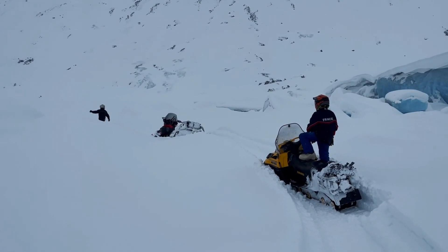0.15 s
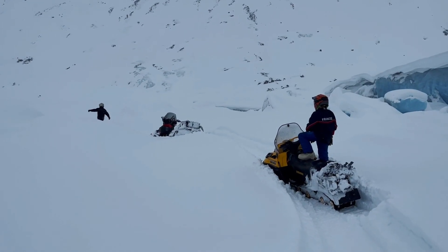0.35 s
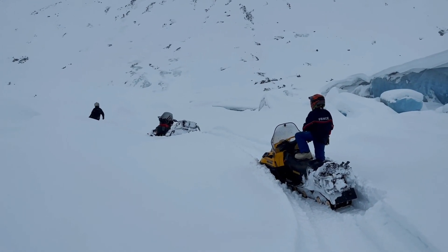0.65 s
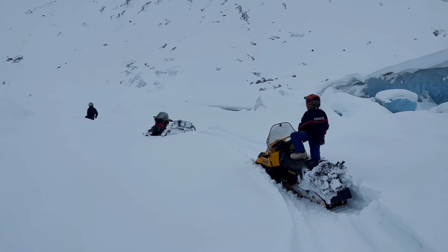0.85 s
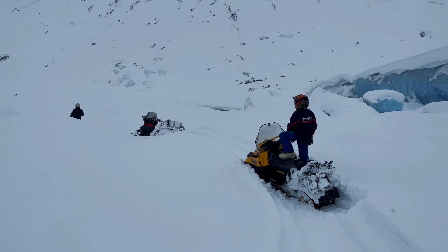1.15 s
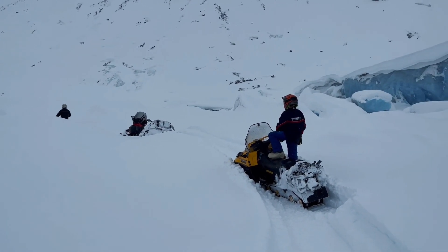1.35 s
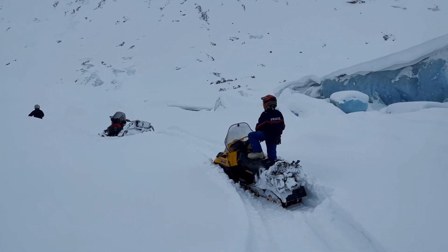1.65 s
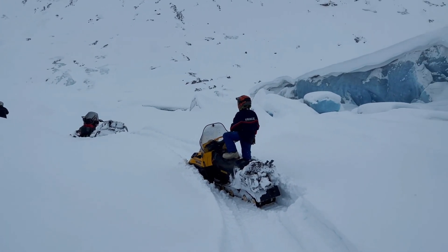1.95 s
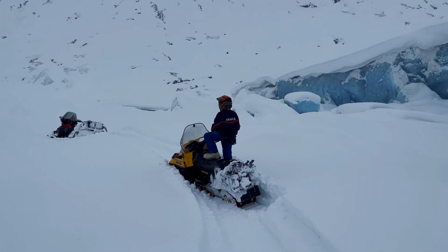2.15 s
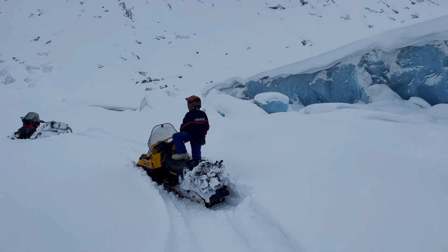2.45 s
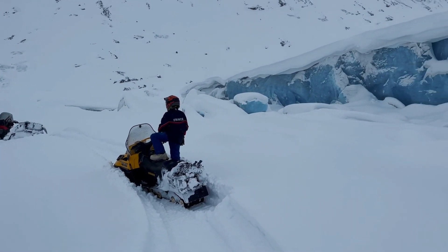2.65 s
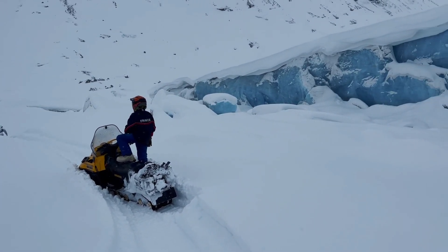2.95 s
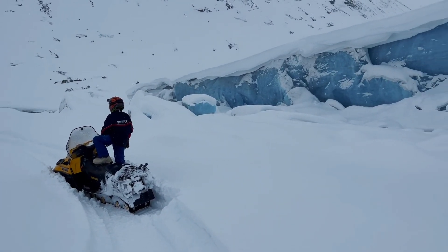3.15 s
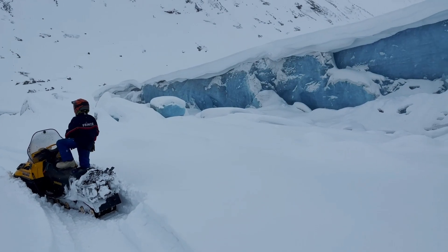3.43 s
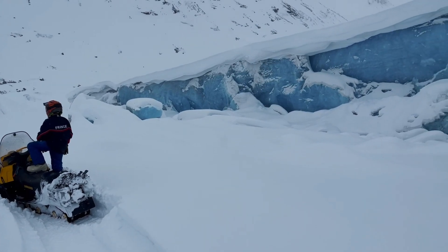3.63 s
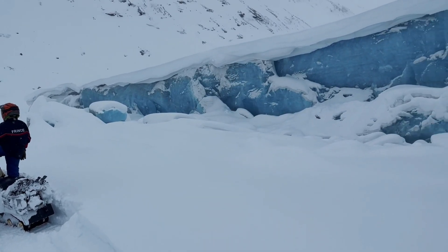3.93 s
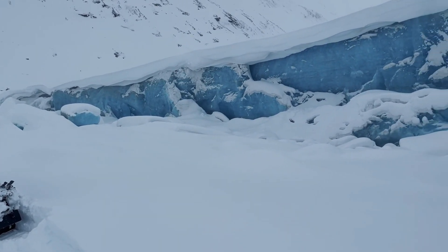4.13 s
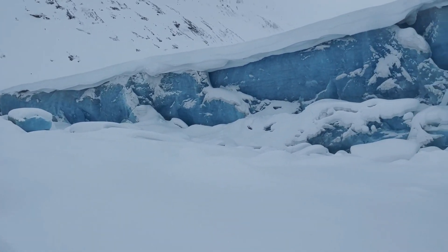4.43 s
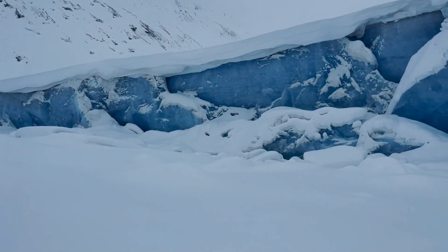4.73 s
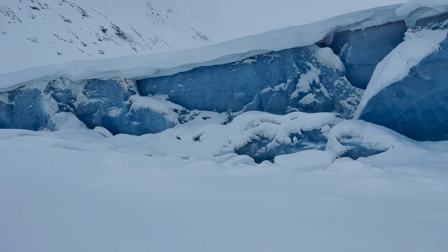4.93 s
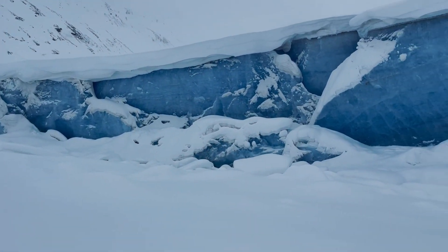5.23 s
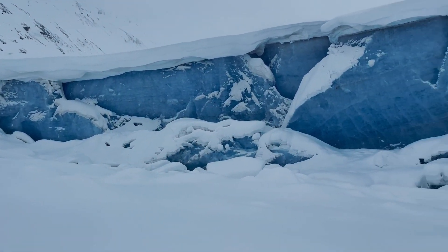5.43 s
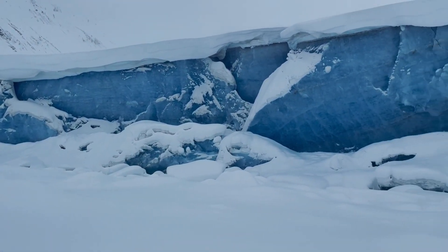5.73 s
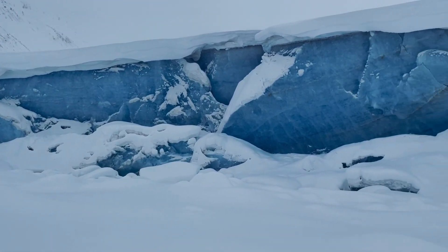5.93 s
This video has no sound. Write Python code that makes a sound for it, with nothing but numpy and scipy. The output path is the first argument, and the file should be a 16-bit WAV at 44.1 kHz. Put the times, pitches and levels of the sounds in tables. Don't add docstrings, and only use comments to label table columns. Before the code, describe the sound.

A small two-stroke snowmobile engine idles from start to finish, close and dry on open snow. Its low, round exhaust pops come about twenty-six per second, in a limping pattern of strong, late, weak and nearly missing beats, with metallic knocks, grainy rattle and a hissy casing whir. From 0 to 0.4 s a few short wind puffs flutter on the microphone, with small low bumps near 0.9, 1.1 and 2.3 s. Between about 2 and 4.8 s the exhaust is fuller and steadier, while the camera's turn shifts the engine leftward and sweeps a hollow, phasey colour through the treble. A soft gust rolls past at 3.7-4.2 s, another at 4.5 s. Around 5 s heavy thumps and rapid buffets hit, continuing irregularly. From 5.75 to 5.95 s the wind is loudest, a bright, tearing, crackling blast, easing into low flutter by 6.08 s.

```python
import sys
import numpy as np
from scipy import signal
from scipy.fft import rfft, irfft, next_fast_len
from scipy.io import wavfile
from scipy.ndimage import uniform_filter1d

SR = 44100
rng = np.random.default_rng(int(sys.argv[2]) if len(sys.argv) > 2 else 0)


def boost_factor(decibels):
    exponent = np.asarray(decibels, float) / 20
    return 10 ** exponent


def persist_wave(psi):
    counts = np.round(np.clip(psi, -1, 1) * 32767).astype(np.int16)
    wavfile.write(sys.argv[1], SR, np.atleast_2d(counts).T)


N = 268348

# puff t/s, knock level/dB, full-firing puff level/dB
CRANK = [(.0664, -42.5, -23), (.421, -39, -25.5), (.7652, -39.5, -19), (1.109, -37.5, -23),
         (1.432, -40, -16.5), (1.7677, -38, -16.5), (2.123, -40.5, -16), (2.4695, -37, -14),
         (2.7954, -42.5, -13.5), (3.113, -39.5, -14), (3.4509, -39, -13.5), (3.7966, -37, -14),
         (4.151, -38, -14), (4.4999, -37.5, -12.5), (4.8472, -40.5, -14), (5.1802, -44, -19),
         (5.525, -38.5, -24), (5.885, -50, -16.5)]
# delay/ms, knock level/dB, puff level/dB
LOPE = [
    (-0.012, 0.5, -1.5),
    (-1.545, -18.5, -13.5),
    (0.67, 1.35, -1),
    (0.031, -14, -5.5),
    (-1.095, -2.5, -7),
    (1.83, -2.5, 0),
]
# t/s, knock level/dB, puff level/dB
ODD_TURNS = [(.267, 6.5, -13), (.341, 3, -3), (.537, -3, -4), (.689, -2, -6.5), (.728, -8.5, -6.5),
             (.999, -4.5, -3), (.921, -4, -14), (1.073, 0.5, -2.5), (1.142, -7.5, -11.5), (1.287, -2, -5),
             (1.396, -8, -5.5), (1.468, -1, -13), (1.768, 2.5, 1), (2.28, 0, -16.5), (2.356, -2.5, -4.5),
             (2.507, -1.5, -5), (2.689, 9.5, 4), (2.939, 0, 6.5), (3.007, -5, -5), (3.113, 0, 3.5),
             (3.488, -11, 2.5), (3.3, -0.5, -0.5), (3.797, -27, 4), (3.993, 0.5, -8), (4.034, 5.5, -0.5),
             (4.459, -4, -13), (4.539, 6.5, 6.5), (4.614, -1, -22), (5.032, -15.5, 0.5), (5.445, 0, -16),
             (.616, 1.5, 0.5), (1.109, 2, -1), (1.22, 0.5, 5.5), (1.584, 3.5, 0), (1.695, 3, 1.5),
             (1.731, -1, -3.5), (1.809, 1.5, 6.5), (1.93, 1.5, 7), (2.008, 7.5, 2), (2.123, 1.5, 3),
             (2.395, -0.5, 5), (2.47, 2, -3), (2.832, -1.5, 7), (3.043, -4, 1.5), (3.188, -3.5, 0),
             (3.263, -1, 10), (3.72, 1, 1.5), (3.836, -3.5, -5), (4.228, -2, 2), (4.423, 2.5, 0),
             (4.5, 3, 2), (4.577, 6, -0.5), (4.731, -3, -4.5), (4.77, 0, -4.5), (4.995, 4, -4),
             (5.143, 4.5, 1.5), (5.295, 2, -5), (5.685, 4.5, -9.5), (5.96, 5.5, -1.5), (6.037, -3.5, -6)]
# f/Hz, width/Hz, knock level/dB, whir level/dB
CASING_MODES = [(400.15, 13.9, -12, -12), (620, 48.6, -24, -8), (787.5, 40.4, -4, -2),
                (1148.4, 249, 0, 2.5), (1645, 254, 3, 0.5), (1924.6, 60.5, 7, 0.5), (2173, 253, 6, -5.5),
                (2598, 196, -5, -6), (3202.2, 87, -3, -27.5), (4325.5, 206, -1, -12.5),
                (6116, 370, -10, -40.5), (6274, 155, -10, -23), (8040, 340, -30.5, -32.5),
                (8538, 567, -5, -28), (10787, 440, -8, -35)]
# f/Hz, density/dB per Hz
HISS_SPECTRUM = [(200, -29), (500, -27.5), (1000, 0), (2100, -9), (2800, -8.5), (4000, -15), (6500, -12),
                 (7300, -22), (9000, -16.5), (11400, -24), (12200, -45.5)]
# t/s, right port lag/ms, whir level/dB
CAMERA_TURN = [(0, -0.0717, 6), (1, -0.0838, 4.5), (1.8, -0.0186, 4), (2.4, 0.129, 3.5), (2.8, 0.2027, 5.5),
               (3.2, 0.2556, 5.5), (3.7, 0.32, 5), (4.2, 0.3593, 4.5), (4.8, 0.4204, 2), (5.4, 0.4506, 2),
               (6.08, 0.44, 0.5)]
# f/Hz, delayed path share/1, lag share/1, unrelated share/1, fixed phase/rad, level/dB
RIGHT_PORT = [(100, 1, 1, .1, 0, -1), (700, 1, .78, .12, 0, -1), (1200, 1, .9, .12, 0, -1),
              (2300, 1, 1.2, .12, 0, -1), (2900, .9, .86, .2, 0, -2), (4200, .9, .74, .2, 0, -2),
              (5200, .7, .66, .3, 0, -3), (6300, .6, .6, .3, 0, -3), (7300, .2, .6, .8, 0, -5),
              (8300, 0, .6, .1, 0, 0), (8700, 0, .6, .1, 0.1, 0), (10250, 0, .6, .1, 3.14, 0),
              (11800, 0, .6, .1, 6.28, 0)]
# lag/ms, f/Hz; above it the whole lag is heard
SINKING_NOTCH = [(.31, 7200), (.375, 5100), (.41, 4250), (.43, 3870)]
# t/s, rumble level/dB
BREEZE = [(0.0, -28.5), (0.238, -34.5), (0.73, -40.5), (1.186, -35), (1.352, -38), (1.432, -32.5),
          (1.6, -47), (2.2, -45), (2.34, -38), (2.45, -46), (3.3, -44), (3.7, -34), (4.02, -30.5),
          (4.26, -34), (4.9, -35.5), (5.03, -23.5), (5.53, -37), (5.9, -28)]
# f/Hz, density/dB per Hz
BREEZE_SPECTRUM = [(20, -47.5), (30, -32), (45, -3), (65, 2), (90, 2.5), (130, -7), (220, -12), (350, -30),
                   (700, -66)]
# t/s, peak level/dB, brightness/octaves over 200 Hz, length/s
GUSTS = [(0.13, -25.5, 1.35, 0.0316), (0.156, -17.5, 2.59, 0.0158), (0.196, -20.5, 1.48, 0.0254),
         (0.262, -28, 0.506, 0.032), (0.408, -30.5, 0.81, 0.0222), (0.858, -27, 0.56, 0.042),
         (1.077, -27, 0.44, 0.0166), (1.405, -35, 1.26, 0.0146), (2.24, -31.5, 0.55, 0.0233),
         (2.328, -27, 1.61, 0.0168), (3.735, -26, 0.668, 0.1268), (3.962, -29, 0.28, 0.039),
         (4.157, -33, 0.856, .13), (4.537, -22, 1.096, 0.0323), (4.987, -13.5, 1.45, 0.0213),
         (5.016, -17.5, 1.33, 0.0087), (5.032, -14, 1.31, 0.0126), (5.059, -17, 0.55, 0.0166),
         (5.08, -17, 1.34, .008), (5.097, -16.5, 1.32, 0.00715), (5.114, -20.5, 1.05, 0.0097),
         (5.123, -16.5, 1.44, 0.0125), (5.138, -15, 0.716, 0.01694), (5.171, -24, 1.04, 0.0118),
         (5.239, -18, 1.556, 0.0166), (5.269, -21, 0.725, 0.0356), (5.335, -16, 1.43, 0.026),
         (5.363, -20, 1.59, 0.0091), (5.378, -21, 1.46, 0.0097), (5.52, -19, 1.61, 0.0403),
         (5.613, -16.5, 1.515, 0.0437), (5.677, -16, 2.263, 0.0212), (5.731, -16.5, 1.63, 0.0495),
         (5.776, -8.5, 2.74, 0.011), (5.783, -11.5, 3.37, 0.00764), (5.795, -12.5, 1.63, 0.0275),
         (5.821, -14, 1.3, .085), (5.819, -10.5, 3.61, 0.00614), (5.827, -8, 3.39, 0.0039),
         (5.835, -7, 3, 0.0081), (5.846, -9, 3.465, 0.0051), (5.856, -7.5, 3.24, 0.0049),
         (5.861, -10, 3.79, 0.009), (5.876, -10.5, 3.56, 0.00825), (5.886, -10, 3.45, 0.0104),
         (5.903, -10, 2.13, 0.0255), (5.925, -15, 2.86, 0.0128), (5.94, -20.5, 1.66, 0.0177),
         (6.003, -17, 1.86, 0.0218), (6.044, -21, 1.52, 0.0288)]
# t/s, level/dB, width/ms
SLAPS = [(.163, -14, 1.1), (4.9915, -3, 2), (5.0545, -3, 2), (5.62, -12, 2.5), (5.6845, -17, 1),
         (5.911, -11, 1.2), (5.082, -15, 1.4), (5.14, -6, 4), (5.247, -9, 1.8), (5.781, -5, 1.3),
         (5.932, -14, .35)]
# t/s, right port lead/rad
SLANT = [
    (0, 0.89),
    (1.2, 0.97),
    (1.4, -0.04),
    (4.9, -0.24),
    (4.97, 0.77),
    (5.74, 0.78),
    (5.77, -0.49),
    (6.08, -0.32),
]
# t/s, level/dB
TICKS = [
    (.931, -46),
    (1.0495, -42),
    (1.086, -38),
    (2.06, -45),
    (3.732, -46),
    (4.105, -45),
    (4.8905, -40),
]


def evened(x):
    return x / np.sqrt(np.mean(x ** 2) + 1e-20)


def read(points, hz):
    f, *values = np.transpose(points)
    return [np.interp(np.log(hz + 1), np.log(f + 1), v) for v in values]


def add(mix, start_s, sound):
    part = mix[..., round(start_s * SR):][..., :sound.shape[-1]]
    part += sound[..., :part.shape[-1]]


def coloured(x, spectrum):
    size = x.shape[-1]
    gain = boost_factor(read(spectrum, np.fft.rfftfreq(size, 1 / SR))[0])
    return irfft(rfft(x) * gain, size)


def ring(x, hz, width_hz):
    r = np.exp(-np.pi * width_hz / SR)
    poles = [1, -2 * r * np.cos(2 * np.pi * hz / SR), r * r]
    return np.sqrt(1 - r * r) * signal.lfilter([1, 0, -1], poles, x) / 2


def band(x, lo_hz, hi_hz, order=2):
    return signal.sosfilt(signal.butter(order, [lo_hz, hi_hz], "bandpass", fs=SR, output="sos"), x)


def firings():
    turns_per_row, last_turn_s = 9, .038
    slip_turn, slip = 134, 2
    scatter_db = 1.3
    end = np.add(CRANK[-1], [turns_per_row * last_turn_s, 0, 0])
    rows = np.vstack([CRANK, end])
    turn = np.arange(len(CRANK) * turns_per_row - 3)
    s, knock_db, puff_db = (np.interp(turn / turns_per_row, np.arange(len(rows)), c) for c in rows.T)
    phase = (turn - slip * (turn >= slip_turn)) % len(LOPE)
    late_ms, *lope_db = np.transpose(LOPE)[:, phase]
    odd_db = np.zeros((2, len(turn)))
    for at_s, *db in ODD_TURNS:
        odd_db[:, np.argmin(abs(s - at_s))] = db
    chance_db = scatter_db * rng.standard_normal((len(turn), 2)).T
    knock_db, puff_db = np.array([knock_db, puff_db]) + lope_db + odd_db + chance_db
    return s + late_ms / 1000, knock_db, puff_db


def casing(puff_s, knock_db):
    port_opens = .74
    t, knock, throb = np.arange(0, .09, 1 / SR), np.zeros(N), np.zeros(N)
    burst = (1 - np.exp(-t / .0045)) * np.exp(-t / .009)
    chug = (t / 0.00815) * np.exp(1 - t / 0.0057)
    swell = np.exp(-t / 0.0312)
    knock_s = np.maximum(puff_s - port_opens * np.gradient(puff_s) - .001, 0)
    under_way = (0.00228, -39)
    for s, db in [under_way, *zip(knock_s, knock_db)]:
        add(knock, s, boost_factor(db + 47.0) * burst)
        add(knock, s + 0.02422, boost_factor(0.29 * (db + 46) - 3.0) * burst)
        add(throb, s, 0.805 * boost_factor(0.605 * (db + 37.5)) * chug)
        add(throb, s, boost_factor(0.72 * (db + 42.0)) * swell)

    grit = boost_factor(1.21 * np.minimum(rng.exponential(1, N // 64 + 1), 4)).repeat(64)[:N]
    knock = knock * evened(grit * rng.standard_normal(N))

    time_s = np.arange(N) / SR
    turning_s, _, whir_db = np.transpose(CAMERA_TURN)
    whir = boost_factor(np.interp(time_s, turning_s, whir_db)) * (0.441 + 0.424 * throb) * rng.standard_normal(N)
    buzz = evened(band(rng.standard_normal(N), 1.54, 24.5, order=1))
    whir = whir * boost_factor(1.03 * buzz)

    turn = np.clip(np.searchsorted(knock_s, time_s) - 1, 0, None)
    uneven = boost_factor(1.7 * rng.standard_normal((len(puff_s), len(CASING_MODES))))
    rings = np.zeros(N)
    for k, (hz, width_hz, mode_knock_db, mode_whir_db) in enumerate(CASING_MODES):
        drive = uneven[turn, k] * boost_factor(mode_knock_db) * knock + boost_factor(mode_whir_db) * whir
        rings += (-1) ** k * ring(drive, hz, width_hz)
    hiss = coloured(knock + boost_factor(-9.5) * whir, HISS_SPECTRUM)
    return boost_factor(-42.5) * rings + boost_factor(-25) * hiss


def exhaust(puff_s, puff_db):
    t, out = np.arange(0, .06, 1 / SR), np.zeros(N)
    rise_s = .008
    glide_hz = 129 + 125 * np.exp(-t / 0.0032)
    spread = rng.standard_normal((len(puff_s), 2))
    weak_db = np.minimum(puff_db - uniform_filter1d(puff_db, size=7), 0)
    for s, db, weak, (pitch, decay) in zip(puff_s, puff_db, weak_db, spread):
        detune = 1 + .02 * pitch + np.clip(.03 * weak, -.22, 0)
        cycles = np.cumsum(glide_hz * detune) / SR
        cycles -= np.interp(rise_s, t, cycles) + 0.011
        decay_s = 0.005442 * (1 + 0.186 * decay)
        shape = t ** 2 * np.exp(-t / decay_s)
        add(out, s - rise_s, boost_factor(db - 0.5) * shape / shape.max() * np.cos(2 * np.pi * cycles))
    return out


def shade(lag_ms, before_db, after_db, passing_db, at_ms, width_ms):
    u = (lag_ms - at_ms) / width_ms
    return before_db + (after_db - before_db) * (1 + np.tanh(u)) / 2 + passing_db * np.exp(-u ** 2 / 2)


def ports(x):
    hz, t, z = signal.stft(x, SR, nperseg=256, noverlap=192)
    turning_s, turning_ms, _ = np.transpose(CAMERA_TURN)
    lag_ms = np.interp(t, turning_s, turning_ms)
    left_db = None
    right_db = shade(lag_ms, -0.9, -1.3, -10.5, 0.2, -0.0784)
    dip_db = shade(lag_ms, -4, -12, -3, 0.2, 0.12)
    top_db = shade(lag_ms, 0, -4, -14, 0.2, 0.12)
    sink_db = shade(lag_ms, 0, -6, -7, .35, .03)
    high_db = shade(lag_ms, 0, -9, 0, .41, .015)
    left_db = shade(lag_ms, -2.5, -2.5, 2.5, 0.2, 0)

    dip_hz = np.interp(lag_ms, [.21, .33], [2420, 2720])
    top_hz = np.minimum(4426 + 7860 * lag_ms, 7150)
    sink_hz = np.interp(lag_ms, *np.transpose(SINKING_NOTCH))
    delayed, reach, loose, phase, db = (np.asarray(c)[:, None] for c in read(RIGHT_PORT, hz))
    delayed, loose, hz = np.clip(delayed, 0, 1), np.clip(loose, 0, 1), hz[:, None] + 1

    def bump(centre_hz, width):
        return np.exp(-.5 * (np.log(hz / centre_hz) / width) ** 2)

    middle, dip, top = bump(1600, 0.46), bump(dip_hz, 0.055), bump(top_hz, 0.108)
    sink, high = bump(sink_hz, .08), bump(7200, .06)
    unfinished = (1 - np.tanh((lag_ms - 0.3518) / 0.0296)) / 2
    slack = 0.953 * unfinished * (hz > dip_hz) * np.exp(-((hz - dip_hz) / 1072) ** 2)
    reach = np.where(hz > sink_hz, 1, reach * (1 - slack))
    paths = delayed * np.exp(-2j * np.pi * hz * reach * lag_ms / 1000) + 1 - delayed
    scatter = np.exp(2j * np.pi * rng.random(z.shape[::-1]).T)
    right = np.sqrt(1 - loose ** 2) * paths * np.exp(1j * phase) + 3.22 * loose * scatter
    right = right * boost_factor(db + middle * right_db + dip * dip_db + sink * sink_db + high * high_db)
    left = boost_factor(middle * left_db + top * top_db)
    return signal.istft(np.array([z * left, z * right]), SR, nperseg=256, noverlap=192)[1][:, :N]


def flaps():
    flap_s, uneven_db, fade_db, dulls, overlap = .024, 2, -5.5, 0.327, 1.066
    chance = rng.standard_normal((len(GUSTS), 8))
    out = []
    for (s, db, octaves, length_s), uneven in zip(GUSTS, chance):
        count = int(np.clip(round(length_s / flap_s), 1, 8))
        for k in range(count):
            flap_db = db + (k > 0) * uneven_db * uneven[k] + fade_db * k / count
            stretch = overlap if k < count - 1 else 1
            out.append((s + k * length_s / count, flap_db, octaves * (1 - dulls * k / count),
                        length_s / count * stretch))
    return out


def wind():
    t = np.arange(N) / SR
    shared, left, right = rng.standard_normal((3, N))
    air = np.array([1.124 * shared + 0.376 * left, shared + 0.39 * right])
    snaps = (rng.random(N) < 2200 / SR) + 0.069
    torn = np.array([1.35 * shared + .25 * left, shared + .25 * right]) * snaps
    lumps = boost_factor(2.654 * evened(band(rng.standard_normal(N), 3.95, 15.9, order=1)))
    rumble = coloured(air, BREEZE_SPECTRUM)
    breeze_db = np.interp(t, *np.transpose(BREEZE)) - 4.0
    out = boost_factor(breeze_db) * lumps * rumble / np.std(band(rumble, 37.45, 59.87))

    tearing = boost_factor(3.12 * np.minimum(rng.exponential(1, N // 128 + 1), 4)).repeat(128)[:N]
    eddies = signal.lfilter([1], [1, -.94], torn * tearing)
    thud = band(air, 61.8, 205.8)
    for s, db, octaves, length_s in flaps():
        thud_db = 3.5 - 8 * (octaves - 1) + 0.4684 * (db + 23.0)
        at, size = round(s * SR), round(1.568 * max(length_s, .004) * SR)
        u = np.linspace(0, 1, size)
        shape = np.minimum(u / 0.135, 1) * np.cos(np.pi * u / 2) ** 1.523
        top_hz = 200 * 2 ** max(octaves, .3)
        flutter = band(eddies[:, at - 2000:at + size], 143, top_hz, order=6)[:, 2000:]
        for piece, over_db in ((flutter, -4), (thud[:, at:at + size], thud_db - 5.5)):
            add(out, s, boost_factor(db + over_db) * evened(piece) * shape[:piece.shape[1]])

    for s, db, width_ms in SLAPS:
        u = np.arange(-400, 400) / SR * 2000 / width_ms
        slap = (1 - u ** 2) * np.exp(-u ** 2 / 2)
        add(out, s - 400 / SR, -boost_factor(db + 2.0) * slap * boost_factor([[1], [-1]]))
    slant_rad = np.interp(t, *np.transpose(SLANT)) / 2 * [[-1], [1]]
    return (signal.hilbert(out, next_fast_len(N))[:, :N] * np.exp(1j * slant_rad)).real


def scene():
    puff_s, knock_db, puff_db = firings()
    engine = exhaust(puff_s, puff_db) + casing(puff_s, knock_db)
    return ports(engine) + wind()


def top_cut(x):
    return signal.sosfilt(signal.butter(12, 16000, fs=SR, output="sos"), x)


def record(dry):
    low_pass = signal.firwin(255, 12015, window=("kaiser", 8), fs=SR)
    x = signal.oaconvolve(dry, low_pass[None], "same")
    x = 1.05 * np.tanh(x / 1.05)
    step_s, step_db, fade_s = 3.0832, -19, .005
    add(x, step_s, boost_factor(step_db) * np.exp(-np.arange(1000) / SR / fade_s) * np.ones((2, 1)))
    for s, db in TICKS:
        add(x, s, boost_factor(db - 4.0) * np.array([[1., -1.]] * 2))
    return top_cut(x)


dry = scene()
out = record(dry)
persist_wave(out)
```